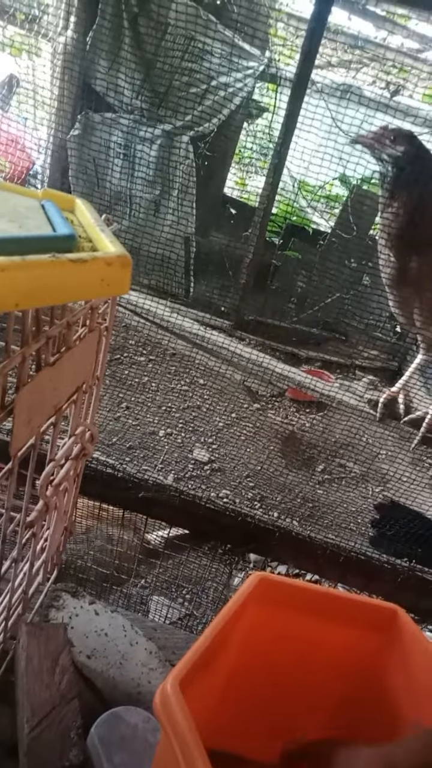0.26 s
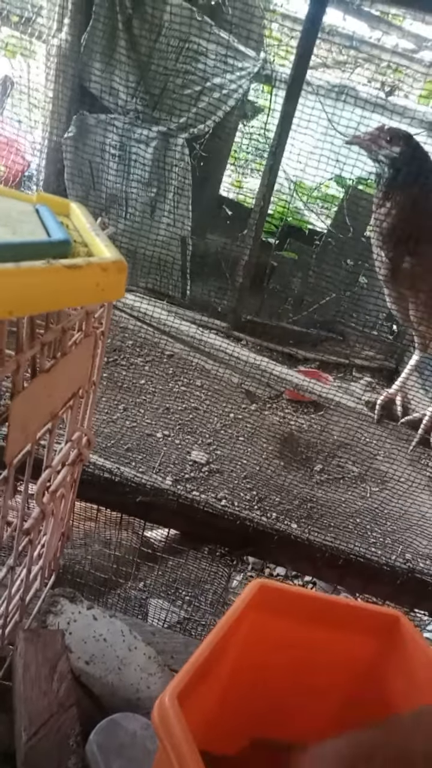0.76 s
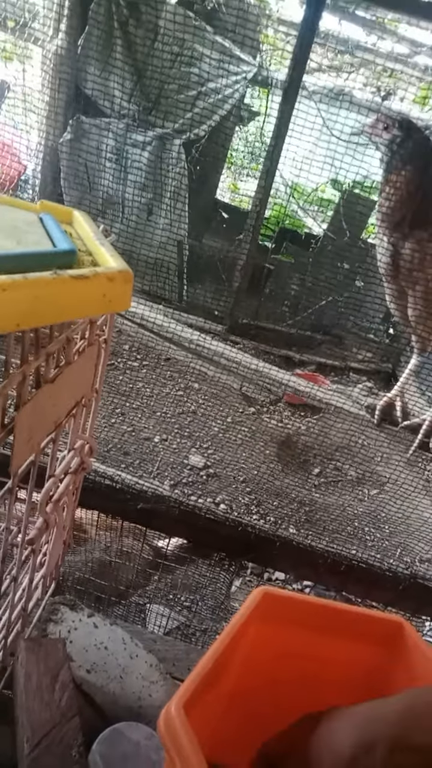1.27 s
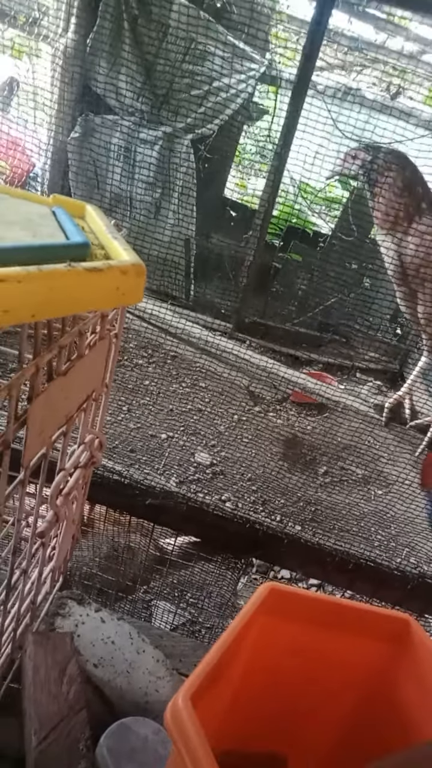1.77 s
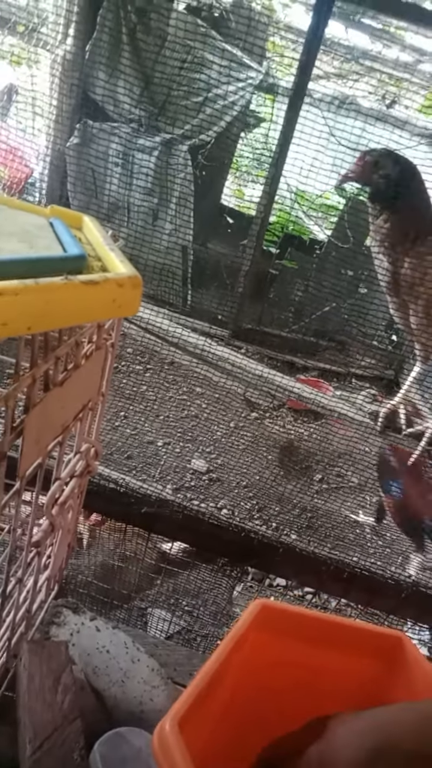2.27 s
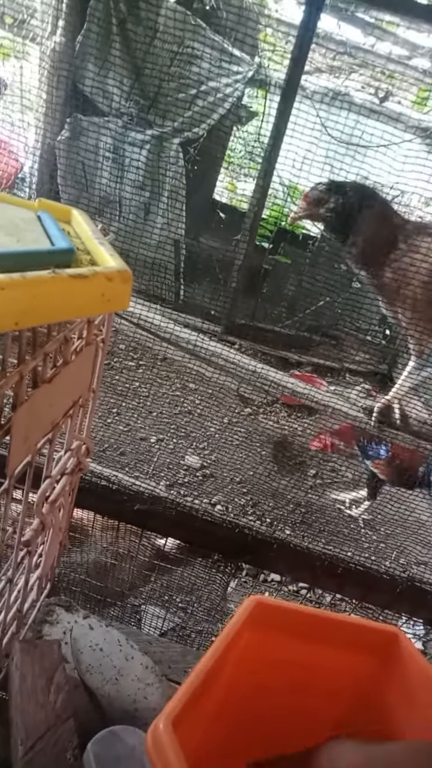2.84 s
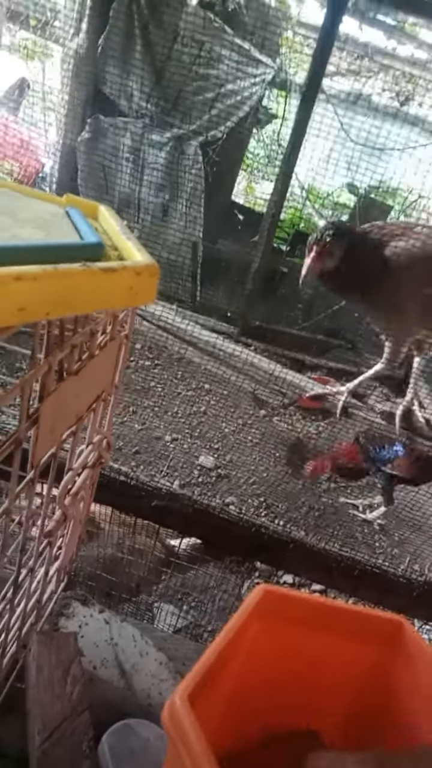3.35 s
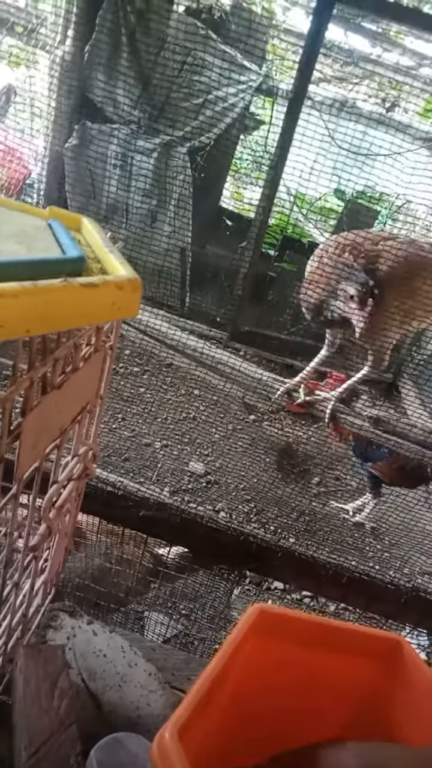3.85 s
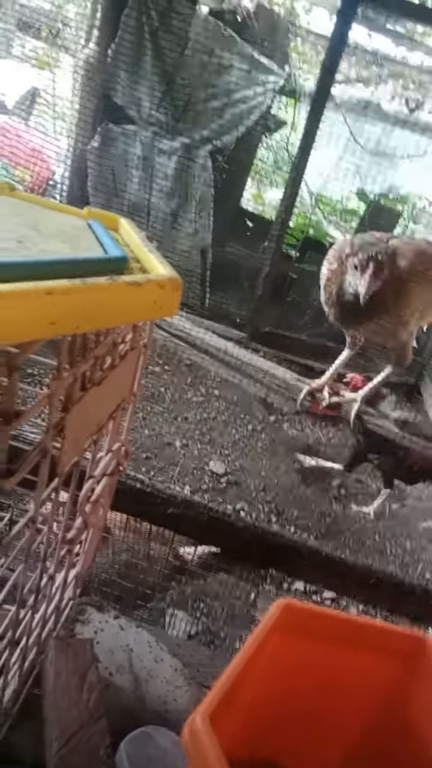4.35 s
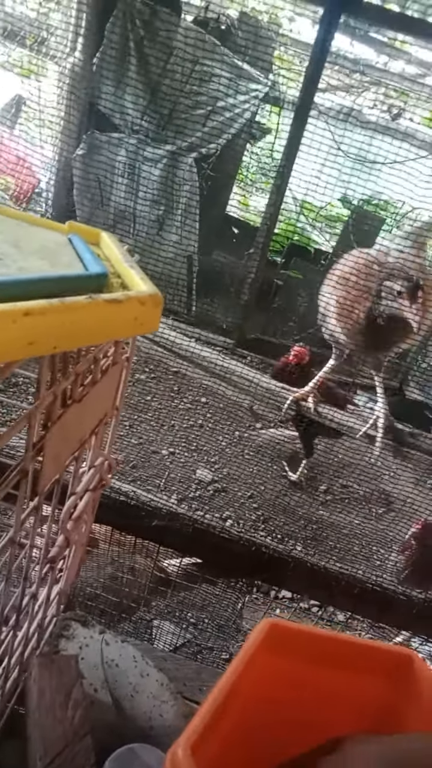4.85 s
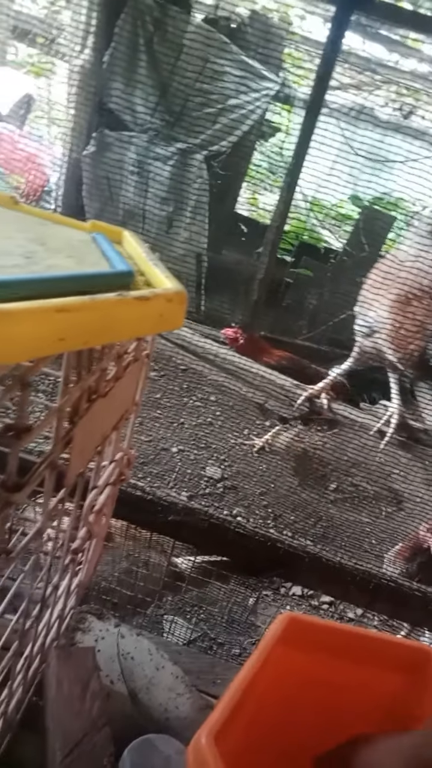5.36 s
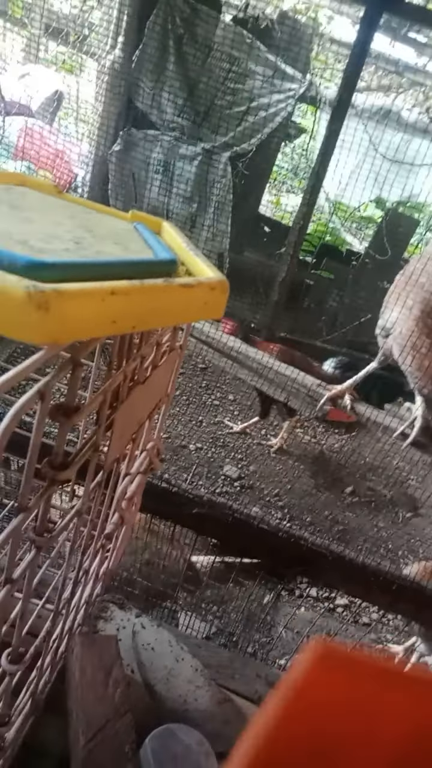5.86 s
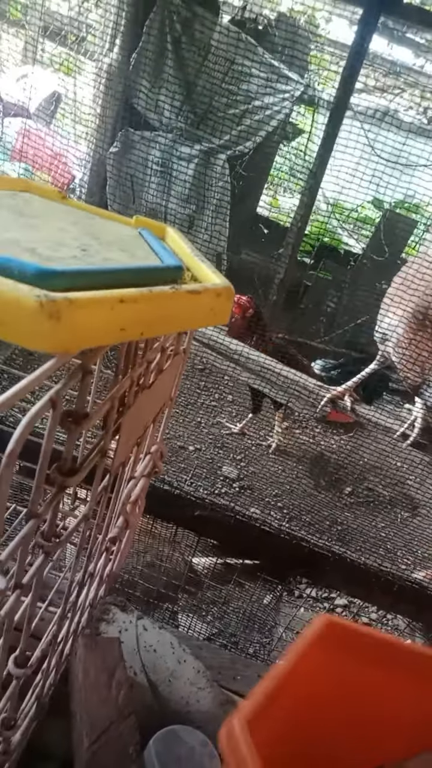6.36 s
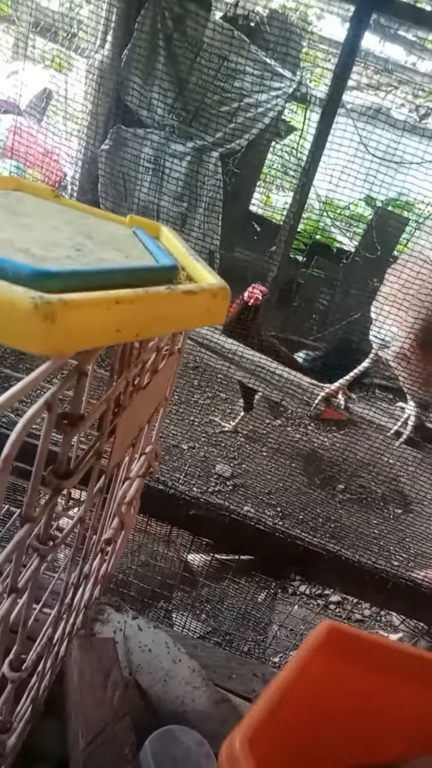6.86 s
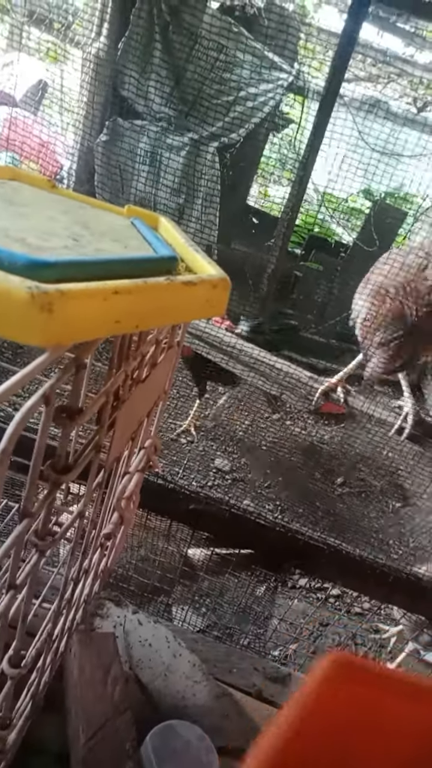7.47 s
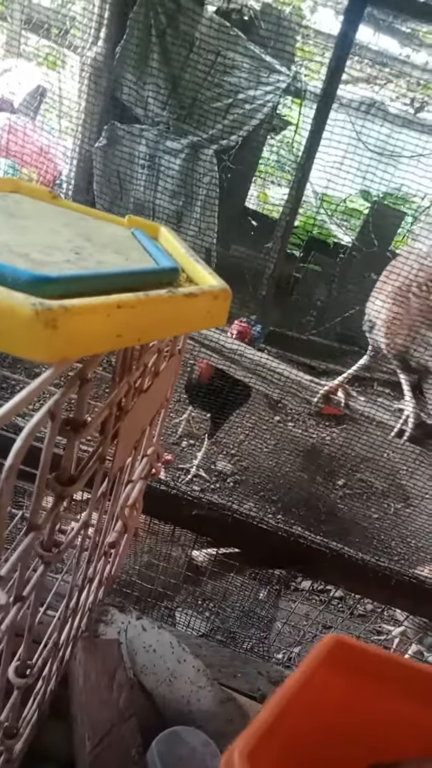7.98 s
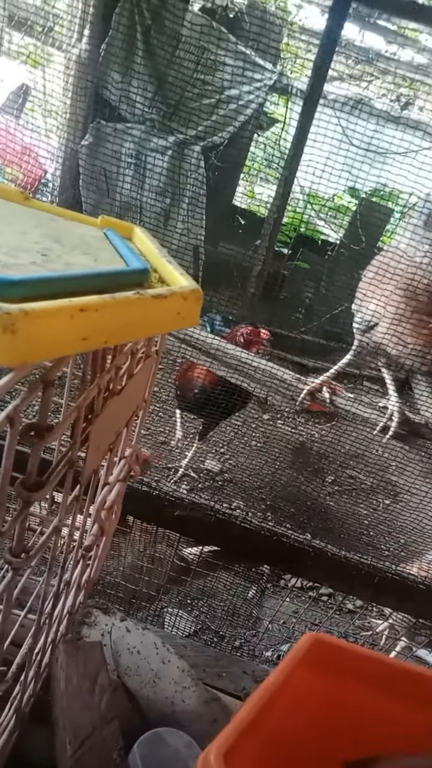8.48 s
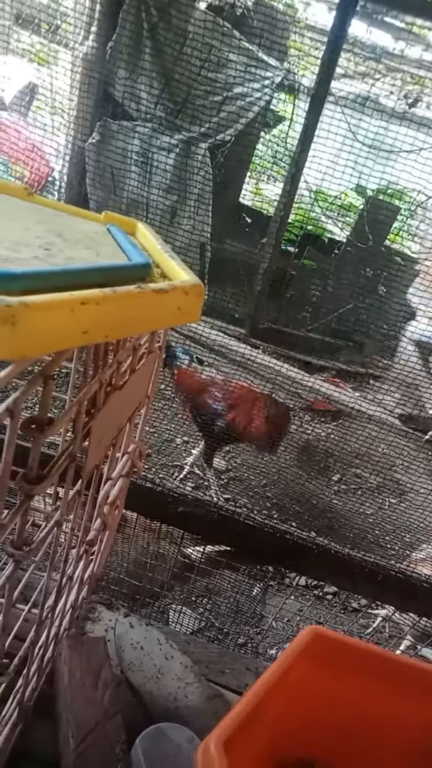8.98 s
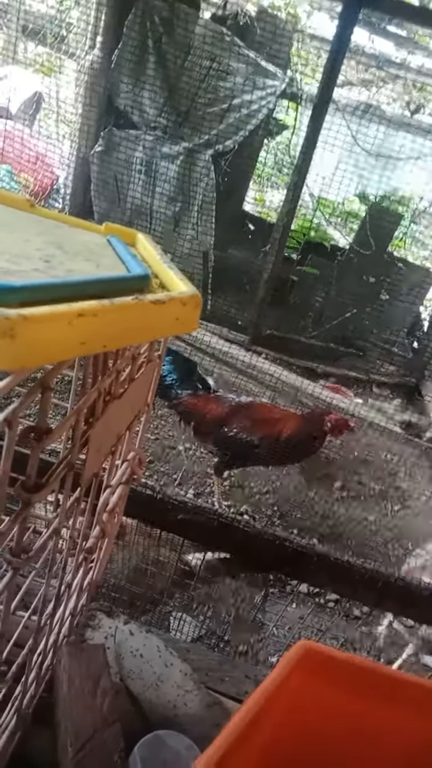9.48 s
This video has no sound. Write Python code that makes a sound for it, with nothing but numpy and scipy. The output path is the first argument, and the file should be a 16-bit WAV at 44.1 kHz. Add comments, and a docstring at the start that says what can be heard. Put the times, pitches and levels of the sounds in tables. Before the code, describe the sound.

A rooster crows loudly and harshly up close while hens cluck and wings thump; later a duller, distant rooster answers amid heavy flapping.

```python
"""A pen of netting and boards, with reflections from a decaying noise tail. At first a far engine hums as two
wavering sines; hens cluck through throat-filtered harmonics, and feathers and litter rustle as filtered noise.
A close rooster crows in rasping syllables, then holds a note whose cycle doubles twice, while feet knock on boards.
Wing beats, scrapes and wire crackle recur as ringing modes and noise; later a duller far rooster answers with
a throbbing note among the beats, and the last flaps and rustles follow over quiet yard air."""
import sys
import numpy as np
from scipy import signal
from scipy.fft import rfft, irfft, next_fast_len
from scipy.io import wavfile
from scipy.ndimage import uniform_filter1d

SR = 44100
rng = np.random.default_rng(int(sys.argv[2]) if len(sys.argv) > 2 else 0)


def store_pcm(level_fs):
    """Save levels as 16-bit WAV."""
    pcm = np.round(np.clip(level_fs, -1, 1) * 32767).astype(np.int16)
    wavfile.write(sys.argv[1], SR, np.atleast_2d(pcm).T)


N = 428652  # samples
T = np.arange(N) / SR  # s

# Close crow, rasping syllables: start_s, length_s, first_pitch_hz, middle_pitch_hz, last_pitch_hz,
# level_db, roughness (0 = clean)
SYLLABLES = [(1.018, 0.1413, 847.9, 838.4, 831.5, -21.5, 0.87), (1.269, 0.099, 821.7, 1019, 1124, -19, .88),
             (1.443, 0.0356, 832.3, 849.6, 847.6, -18.5, 0.42),
             (1.475, 0.4576, 932, 926.4, 860.8, -20, 0.83), (1.962, .055, 845.2, 827, 835.6, -26, 0.9),
             (2.895, 0.0272, 877.3, 883, 852.9, -30.5, 0.61)]
# Moments when the membranes lock and the voice turns cleaner and louder; the fundamental drops or rises:
# centre_s, half_length_s, gain_db, fundamental_gain_db
LOCKS = [(1.088, .015, 7.5, -12), (1.304, 0.011, 1.5, 1.5), (1.896, 0.011, 5.5, -12.5),
         (6.732, 0.026, 3.5, 4)]
LOCK_CLEANS, LOCK_OVERTONES_DB = .8, -9  # share of roughness removed; change of the third partial and up
# Resonances of the close rooster's throat: frequency_hz, gain_db
THROAT = [(430, -35), (600, -23.5), (700, -4), (950, -5), (1150, -10), (1450, -11.5), (1700, 0.5),
          (2230, -4), (2650, -18.5), (3070, -3), (3400, -20), (3700, -32), (5000, -46.5), (6400, -35),
          (7300, -42), (7700, -55), (15000, -62)]
# Level of the held note, with a quick rise, slight dip and late recovery: time_s, level_db
NOTE_LEVEL = [(2.015, -24), (2.045, -16), (2.1, -17), (2.22, -17), (2.3, -17), (2.54, -17.5), (2.74, -18.5),
              (2.83, -16.5)]
# Whole-multiple partials of the held note: pitch_multiple, gain_db
HELD_LINES = [(1, -19), (2, 0), (3, -24), (4, -24), (5, -50), (6, -57), (7, -44), (8, -48), (9, -50),
              (10, -55)]
# Subharmonic lines of the first cycle doubling: pitch_multiple, gain_db
HALF_LINES = [(1.5, -12.5), (2.5, -3.5), (3.5, 1), (5.5, -35), (7.5, -27), (8.5, -39)]
# Subharmonic lines of the second cycle doubling: pitch_multiple, gain_db
QUARTER_LINES = [(.75, -4.5), (1.25, -5.5), (1.75, 2), (2.25, 3.5), (2.75, -21), (3.25, -8.5), (7.25, -25),
                 (7.75, -29)]
# What the narrowed beak does to the partials: pitch_multiple, gain_db
BEAK_COLOUR = [(1, 9.5), (2, -0.5), (4, -13), (7, 1), (7.5, 14), (8, 17), (9, 0.5)]

ATTACK_S, RELEASE_DB_PER_S = .022, 478  # of a crow's syllables and notes
# The close held note sinks as the air runs out
NOTE_S, NOTE_LENGTH_S, NOTE_HZ, SAG_HZ_PER_S = 1.985, 0.9024, 831, 13
HALVES_S, HALVES_DB, HALVES_FADE_DB_PER_S = 2.305, -31, -11.5  # first doubling: start, starting gain, fade
QUARTERS_S, QUARTERS_LENGTH_S, QUARTERS_DB = 2.345, 0.1373, -44.5  # brief second doubling
SPLIT_TREBLE_DB = -8.5  # the second doubling dulls the top partials
# The beak narrows late: softer overall, middle partials thinner, fundamental and treble stronger
BEAK_S, BEAK_CLOSING_S, BEAK_LOSS_DB = 2.5766, .035, -5
SMEAR_RAD = .14  # scale of the phase unsteadiness that each multiple above the fourth adds
FLUTTER_HZ = 36.934  # mean rate at which rough membranes take turns
PULSING_DB = 2  # swing of the voice level per unit of roughness

# Far crow syllables: start_s, length_s, first_pitch_hz, middle_pitch_hz, last_pitch_hz,
# level_db, roughness (0 = clean)
FAR_SYLLABLES = [(5.775, 0.125, 763.6, 778.6, 776, -43.5, 0.68),
                 (6.04, 0.1504, 881.4, 999.2, 968.7, -38.5, 0.61),
                 (6.29, 0.41, 820.4, 935.6, 799.5, -35, 0.783)]
# Resonances of the far rooster's throat: frequency_hz, gain_db
FAR_THROAT = [(500, -18.5), (800, -3), (900, -0.5), (1250, -7.5), (1600, -2.5), (1950, 1.5), (2400, -24),
              (2950, -17), (3400, -30), (4000, -38), (4850, -26.5), (5700, -45.5), (7000, -49),
              (9000, -53.5)]
# Partials of the far held note: pitch_multiple, gain_db
FAR_LINES = [(1, -13), (1.5, -30), (2, -0.5), (3, -31.5), (5, -34), (6, -34)]
# The far note scoops up to pitch, sinks and fades
FAR_NOTE_S, FAR_NOTE_LENGTH_S, FAR_NOTE_DB, FAR_FADE_DB_PER_S = 6.8, 0.7472, -39.5, -6
FAR_HZ, FAR_SAG_HZ_PER_S, SCOOP_HZ, SCOOP_S = 835, 76, 87.5, 0.069
THROB_HZ, THROB_DEPTH = 10.1, 0.521  # round swells between sharp dips

# Hen calls: start_s, length_s, first_pitch_hz, last_pitch_hz, level_db, roughness (0 = clean)
CLUCKS = [(.235, 0.063, 372, 350.7, -51, 1.23), (2.754, 0.0513, 607.4, 565.7, -38, 0.66),
          (2.871, 0.0554, 616.6, 547, -37.5, 0.67), (3.36, 0.0714, 399, 343.6, -44, 1.04),
          (4.184, 0.0399, 416.3, 570.4, -45.5, .4), (4.221, 0.065, 577.3, 776.2, -40.5, 0.71),
          (4.345, 0.1126, 512.7, 545.6, -41, .9), (4.922, 0.29, 860, 1026, -68.5, 0.41),
          (6.18, 0.0612, 599.7, 361.6, -38, .4), (7.539, 0.10177, 756, 619.7, -39.5, 0.38),
          (7.988, 0.0566, 617.6, 611.7, -35.5, 0.65), (8.11, 0.0434, 622, 590.4, -41, 0.68),
          (8.264, .105, 414.8, 304.2, -46, 0.31), (8.67, 0.0381, 642, 591.5, -47.5, 0.66)]
# Resonances of a hen's throat: frequency_hz, gain_db
HEN_THROAT = [(200, -1.5), (340, 0.5), (480, -7.5), (630, -4.5), (850, -4.5), (1220, -3), (1500, -16),
              (1850, -14.5), (2150, -25), (4000, -36), (8000, -52.5)]

# Wing beats: start_s, relative_level_db, second_wing_lag_s (0 = both together)
BEATS = [(.362, -36.5, 0.0014), (.565, -22, 0.0218), (.684, -21.5, 0.0273), (1.571, -26, 0),
         (1.795, -23.5, 0.0498), (1.869, -14, .01), (3.027, -31.5, 0.054), (3.121, -34.5, 0.001),
         (3.203, -30.5, 0.0538), (3.536, -29.5, 0.0636), (3.698, -33, 0.0418), (4.158, -28, 0.0412),
         (4.267, -30, 0.0052), (4.453, -22, 0.0219), (4.507, -26.5, 0), (4.548, -26, 0.0016),
         (4.618, -32, 0.0013), (4.846, -31, 0.0494), (5.11, -37, 0.0338), (5.302, -47, 0.0033),
         (5.645, -34.5, 0.00025), (5.754, -29.5, 0.00098), (5.851, -29, 0.0037), (5.958, -19, 0),
         (6.252, -11, 0), (6.446, -14.5, 0.00024), (6.613, -13.5, 0), (6.797, -20, 0.0013),
         (6.953, -17.5, 0), (7.082, -24.5, 0), (7.188, -27, 0.0448), (7.312, -30, 0.00104),
         (7.527, -21.5, 0.0272), (8.021, -32, 0), (8.957, -40.5, 0.0011), (9.059, -33.5, 0.038),
         (9.254, -22, 0.0265)]
# Mean modes of the boom of pushed air: frequency_hz, gain_db, t60_s
THUMP_MODES = [(113, -14.5, 0.081), (175.9, -4, 0.0956), (242.5, -4, 0.062), (339.93, -9, 0.018),
               (421.4, 1, 0.03617), (637.7, -16, .039)]
SECOND_WING_DB, FLICK_DB = -2.5, -21  # the later wing against the first; the feather flick against its beat
# Hard slaps of feathers: time_s, relative_level_db
SLAPS = [(0.585, -27), (0.6834, -18), (0.7024, -17.5), (3.2061, -41), (4.2662, -36.5), (4.3924, -30),
         (4.422, -35.5), (4.447, -27.5), (4.455, -23.5), (4.4697, -24.5), (4.494, -31), (5.7564, -30.5),
         (5.9573, -31.5), (6.469, -38.5), (7.5289, -20.5), (9.0615, -43), (9.2515, -32), (9.28, -21.5)]
# Bouts of feathers brushing: peak_s, relative_level_db, rise_s, fall_s (each over 20 dB)
RUSTLES = [(.48, -47, 0.085, 0.01), (.59, -44.5, 0.16, 0.5836), (1.88, -39.5, .3, 0.4967),
           (3.08, -53, 0.0564, 0.23), (3.212, -49, 0.039, 0.0421), (3.32, -49.5, 0.0675, 0.1346),
           (3.4, -48, 0.063, 0.04), (4.28, -46.5, 0.062, 0.1209), (4.36, -50, 0.059, 0.1072),
           (4.475, -43, 0.117, 0.0144), (5.81, -42.5, 0.055, 0.507), (5.98, -39.5, 0.046, 0.1383),
           (6.28, -57, 0.2293, 0.583), (7.38, -53, 0.0793, 0.8046), (7.58, -45, 0.167, 0.2093),
           (9.1, -51.5, .04, 0.104), (9.265, -39, 0.0762, 0.12)]
# Spectrum of feathers and litter: frequency_hz, gain_db
FEATHERS = [(150, 0), (400, 2.5), (750, 0), (1150, 4.5), (1700, -1), (2600, 0), (3900, -3.5), (5000, -20.5),
            (6500, -20), (8000, -35.5), (15000, -43.5)]
SNAPS_PER_S, SNAPS_DB = 160, -3  # mean rate of lone snaps; their rms against the bout

# Claws on grit and wire: start_s, relative_level_db
CLAWS = [(0.823, -23.5), (0.855, -39), (0.8761, -24.5), (3.4203, -29.5), (3.436, -34.5), (3.6065, -29.5),
         (3.6268, -27), (4.52, -28), (8.6313, -35), (9.5376, -35)]
# Resonance of a claw: claw_pitch_multiple, gain_db
CLAW_RING = [(.7, -22), (.93, 0), (1.35, -5), (1.68, -7), (2, -20), (5, -39)]
CLAW_HZ = 2980  # mean claw pitch
# Feet landing on boards: start_s, relative_level_db
KNOCKS = [(1.679, -28), (1.797, -15.5), (1.837, -15.5), (1.917, -9.5), (3.027, -30), (3.076, -27),
          (3.26, -29), (4.27, -27), (4.355, -28), (4.454, -20.5), (7.531, -27.5), (9.062, -32.5)]
# Mean modes of a board: frequency_hz, gain_db, t60_s
BOARD_MODES = [(267.6, -6, 0.056), (505, -1.5, 0.021), (710, -6.5, .04), (1080, -6.5, .04),
               (1460, -13, 0.023)]
# Wire netting crackling as birds brush it: start_s, length_s, level_db
CRACKLES = [(3.634, 0.0876, -62.5), (4.632, 0.0441, -49), (5.821, 0.0224, -49), (6.271, 0.074, -53),
            (7.347, 0.073, -65.5), (7.855, .05, -52), (7.939, 0.0462, -57), (9.495, 0.101, -57)]
# Spectrum of the wire ticks: frequency_hz, gain_db
NETTING = [(1500, -7.5), (3300, 3), (4300, -8), (5200, 0.5), (6500, -3.5), (7600, -18.5), (8800, -10.5),
           (15000, -21)]

# Far engine: time_s, mean_firing_rate_hz, mean_level_db
ENGINE = [(0, 72.62, -57.5), (.95, 75.85, -49), (1.08, 107.6, -50), (1.25, 113, -46), (1.9, 114.2, -42),
          (2.7, 119, -51), (3.2, 118.4, -70)]
# Spectrum of the yard air: frequency_hz, gain_db
YARD = [(35, -32), (62, -15.5), (120, -2), (250, -12.5), (500, -20), (3500, -27.5), (5000, -40),
        (6400, -36.5), (8000, -44), (15000, -45.5)]
YARD_DB = -62  # mean level
TOP_HZ = 15700  # upper edge of the passband


def close_rooster():
    """Period doubling: chaotic syllables lock into a clean note, whose cycle doubles twice before it breaks off."""
    rasp = syllables(SYLLABLES, THROAT, wobble=.038, wobble_rate=320, shimmer_db=5.5, air=3.8,
                     overtones_db=-4.5, fundamental_db=1)
    t = T - NOTE_S
    unsteady = 1 + 0.0024 * walk(160) + 0.002064 * walk(16)
    phase = 2 * np.pi * np.cumsum((NOTE_HZ - SAG_HZ_PER_S * t) * unsteady) / SR
    hiss = undb(-36.5) * unit(colour(rng.standard_normal(N), THROAT))
    whole = (partials(phase, HELD_LINES) + hiss) * undb(curve(NOTE_LEVEL))

    since_split = T - HALVES_S
    halves_db = HALVES_DB + HALVES_FADE_DB_PER_S * np.maximum(since_split, 0) + 1.3 * walk(20)
    halves = partials(phase, HALF_LINES) * gate(since_split, NOTE_LENGTH_S) * undb(halves_db)
    quarters_gate = gate(T - QUARTERS_S, QUARTERS_LENGTH_S)
    quarters = partials(phase, QUARTER_LINES) * quarters_gate * undb(QUARTERS_DB)
    held = (whole + halves + quarters) * gate(t, NOTE_LENGTH_S) * undb(BEAK_LOSS_DB * narrowing())
    return rasp, held


def partials(phase, lines, flutter_db=0.74, wander_db=1.095):
    """Additive synthesis: sines on multiples of one phase; the high ones flutter and wander most."""
    out = 0
    beak = narrowing()
    split = gate(T - QUARTERS_S, QUARTERS_LENGTH_S)
    for k, db in lines:
        beak_db = beak * np.interp(k, *np.transpose(BEAK_COLOUR))
        split_db = SPLIT_TREBLE_DB * split * np.clip((k - 3) / 2, 0, 1)
        waver_db = flutter_db * k * np.tanh(walk(26)) + wander_db * max(k - 2, 0) * np.tanh(walk(12))
        smear = SMEAR_RAD * max(k - 4, 0) * walk(110)
        out = out + np.sqrt(2) * np.sin(k * phase + smear) * undb(db + beak_db + split_db + waver_db)
    return out


def narrowing():
    """Changing aperture: how far the beak has narrowed, 0-1."""
    return .5 + .5 * np.tanh((T - BEAK_S) / (2 * BEAK_CLOSING_S))


def syllables(rows, throat, overtones_db, fundamental_db, **membranes):
    """Synchronisation: each syllable arches in pitch and rasps, except where the two membranes lock."""
    out = np.zeros(N)
    at, half, gain_db, low_db = np.transpose(LOCKS)
    for s, length, first_hz, middle_hz, last_hz, db, rough in rows:
        t = T[:int(length * SR) + SR // 6]
        along = np.minimum(t / length, 1)
        arch = np.polyfit([0, .5, 1], [first_hz, middle_hz, last_hz], 2)
        hz = np.polyval(arch, along)
        locks = np.exp(-((s + t[:, None] - at) / half) ** 4)  # one flat-topped bump per lock
        lock = locks.sum(axis=1)
        voice = syrinx(hz, rough * (1 - LOCK_CLEANS * lock), throat,
                       overtones_db=overtones_db + LOCK_OVERTONES_DB * lock,
                       fundamental_db=fundamental_db + locks @ low_db, **membranes)
        add(out, s, voice * gate(t, length) * undb(db + locks @ gain_db))
    return out


def syrinx(hz, rough, throat, wobble, wobble_rate, shimmer_db, air, overtones_db, fundamental_db,
           lower=.83, lower_octave_db=-12):
    """Source and filter: two coupled membranes, the slacker at `lower` times the pitch, drive a resonant throat."""
    n = len(hz)
    # the membranes take turns at a nearly steady rate, and the pitch swings at each handover
    cycle = 2 * np.pi * np.cumsum(FLUTTER_HZ * (1 + .14 * walk(70, n))) / SR
    stumble = wobble * rough * (walk(wobble_rate, n) + 1.3 * np.sin(2 * cycle))
    phase = 2 * np.pi * np.cumsum(hz * (1 + stumble)) / SR
    turn = np.minimum(rough, 1) * (.5 + .5 * np.sin(cycle))
    low = ((1 - turn) * np.sin(phase) + turn * np.sin(lower * phase)) * undb(fundamental_db)
    octave = turn * np.sin(2 * lower * phase) * undb(lower_octave_db)
    upper = 0
    for k in range(2, 10):
        shimmer = shimmer_db * rough * walk(wobble_rate, n)
        swell_db = 2.0 * walk(14, n)  # each harmonic swells and fades slowly by itself
        upper = upper + np.sin(k * phase) * undb(overtones_db * (k > 2) + shimmer + swell_db)
    # air hisses through in puffs as the membranes take turns
    puffs = air * rough * (.5 + turn) * rough * rng.standard_normal(n)
    voice = colour(low + octave + upper + puffs, throat)
    return even(voice) * undb(PULSING_DB * rough * np.cos(2 * cycle))


def gate(t, length):
    """Breath envelope: smooth attack, hold, then exponential decay."""
    attack = np.sin(np.pi / 2 * np.clip(t / ATTACK_S, 0, 1)) ** 2
    return attack * undb(-RELEASE_DB_PER_S * np.maximum(t - length, 0))


def far_rooster():
    """Amplitude modulation: arching rough syllables, then a sinking, fading note that throbs ten times a second."""
    out = syllables(FAR_SYLLABLES, FAR_THROAT, wobble=0.0246, wobble_rate=270, shimmer_db=6.5, air=2.5,
                    overtones_db=-2.5, fundamental_db=2.5, lower=.925, lower_octave_db=5)
    t = T[:SR]
    hz = FAR_HZ - FAR_SAG_HZ_PER_S * t - SCOOP_HZ * np.exp(-t / SCOOP_S)
    phase = 2 * np.pi * np.cumsum(hz * (1 + 0.0042 * walk(200, len(t)))) / SR
    note = sum(np.sqrt(2) * np.sin(k * phase) * undb(db + 4.5 * walk(35, len(t))) for k, db in FAR_LINES)
    throb = np.abs(1 - THROB_DEPTH * np.exp(2j * np.pi * THROB_HZ * t))
    level = undb(FAR_NOTE_DB + FAR_FADE_DB_PER_S * t)
    add(out, FAR_NOTE_S, note * gate(t, FAR_NOTE_LENGTH_S) * throb * level)
    return out


def hens():
    """Source and filter: gliding harmonics through a hen's throat make short clucks and soft whines."""
    out = np.zeros(N)
    for s, length, first_hz, last_hz, db, rough in CLUCKS:
        n = int(length * SR)
        glide = np.linspace(first_hz, last_hz, n)
        voice = syrinx(glide, np.full(n, rough), HEN_THROAT, wobble=0.0524, wobble_rate=400,
                       shimmer_db=5.5, air=2.6, overtones_db=-0.5, fundamental_db=0)
        add(out, s, undb(db) * voice * signal.windows.tukey(n, .6))
    return out


def thumps():
    """Damped modes: each wing stroke pushes a puff of air that booms briefly and scatters in the pen."""
    out, t = np.zeros(N), T[:SR // 4]
    for s, db in strokes():
        # the bird moves, so each puff rings differently
        ring = modes(THUMP_MODES, t, gain_spread_db=2.2, pitch_spread=.045, delay=.005)
        ring = ring * np.sin(np.pi / 2 * np.minimum(t / 0.00713, 1)) ** 2
        puff = undb(db + 2.5) * ring / np.abs(ring).max()
        add(out, s, puff + undb(-8.5) * pen(puff, t60=0.2023))
    return signal.sosfilt(signal.butter(3, 130, "high", fs=SR, output="sos"), out)


def strokes():
    """Paired sources: time and level of every wing stroke; a lagging second wing is a little weaker."""
    first = [(s, db) for s, db, lag in BEATS]
    second = [(s + lag, db + SECOND_WING_DB) for s, db, lag in BEATS if lag > 0]
    return first + second


def modes(rows, t, gain_spread_db, pitch_spread, delay=0):
    """Modal synthesis: decaying sines, randomly spread in gain and pitch."""
    ring = 0
    for (hz, gain, t60), c in zip(rows, rng.standard_normal((len(rows), 2))):
        decay = undb(gain + gain_spread_db * c[0] - 60 * t / t60)
        ring = ring + decay * np.sin(2 * np.pi * hz * (1 + pitch_spread * c[1]) * (t - delay))
    return ring


def feathers():
    """Friction noise: barbs and dry litter crackle in band noise, with a burst at each slap or wing stroke."""
    bouts = 0
    for s, db, rise, fall in RUSTLES:
        drop = np.where(T < s, ((s - T) / rise) ** 2, (T - s) / fall)
        bouts = bouts + undb(db - 20 * drop)
    force, t = bouts * undb(3.2 * walk(90)), T[:SR // 6]
    flicks = [(s, db + FLICK_DB) for s, db in strokes()]
    for s, db in SLAPS + flicks:
        add(force, s - .001, undb(db - 2 - 60 * t / 0.061) * np.minimum(t / 0.0023, 1))
    # the colour shifts as the wing folds: each band swells and crackles by itself
    barbs = 0
    edges = np.geomspace(120, 16000, 13)
    for band in zip(edges, edges[1:]):
        crackle = rng.standard_normal(N) * undb(4.6 * walk(380))
        band_filter = signal.butter(2, band, "band", fs=SR, output="sos")
        barbs = barbs + signal.sosfilt(band_filter, crackle) * undb(7.3 * walk(70))
    brushing = even(colour(barbs, FEATHERS)) * undb(2 + 3 * walk(500)) * force
    # stiff quills and bits of litter snap singly among the barbs
    snaps = (rng.random(N) < SNAPS_PER_S / SR) * rng.standard_normal(N)
    return brushing + unit(colour(snaps, FEATHERS)) * bouts * undb(SNAPS_DB)


def claws():
    """Resonant friction: a gritty, stuttering noise scrape excites a short ring."""
    out, t = np.zeros(N), T[:SR // 6]
    for s, db in CLAWS:
        hz = CLAW_HZ * (1 + .05 * rng.standard_normal())
        grit = rng.standard_normal(len(t)) * undb(3.5 * walk(500, len(t)))
        ring = colour(grit, [(multiple * hz, gain) for multiple, gain in CLAW_RING])
        add(out, s, unit(ring) * undb(db - 8.5 - 60 * t / 0.055) * np.minimum(t / 0.001, 1))
    return out


def knocks():
    """Struck plate: a foot lands on a board, whose modes ring differently at each spot."""
    out, t = np.zeros(N), T[:SR // 6]
    for s, db in KNOCKS:
        ring = modes(BOARD_MODES, t, gain_spread_db=2.5, pitch_spread=.07)
        add(out, s, undb(db) * ring * np.minimum(t / 0.0014, 1))
    return out


def netting():
    """Stick and slip: unevenly modulated bright noise for wires slipping over each other."""
    out = np.zeros(N)
    for s, length, db in CRACKLES:
        t = T[:int(length * SR) + SR // 20]
        ticks = rng.standard_normal(len(t)) * undb(5.9 * walk(450, len(t)))
        ticks = unit(colour(ticks, NETTING))
        add(out, s, ticks * undb(db - 1500 * np.maximum(t - length, 0)))
    return out


def engine():
    """Periodic firing: a wavering low hum of a fundamental and its octave from beyond the yard."""
    phase = 2 * np.pi * np.cumsum(curve(ENGINE) * (1 + 0.18 * walk(49))) / SR
    hum = np.sin(phase) + undb(-14.5) * np.sin(2 * phase)
    return hum * loudness(ENGINE, axis=2) * undb(4 * walk(30))


def yard():
    """Broadband ambience: quiet outdoor air as coloured noise, swelling a little."""
    return unit(colour(rng.standard_normal(N), YARD)) * undb(YARD_DB + 0.52 * walk(3.2))


def pen(x, t60=0.28):
    """Reverberation by convolution: boards and roof scatter sound into a short, slightly dull tail."""
    t = T[:SR // 2]
    tail = colour(rng.standard_normal(len(t)), [(100, 0.0), (3000, 1.5), (7000, -0.5), (15000, -7.5)])
    tail *= undb(-60 * t / t60) * (t > .005)
    return signal.fftconvolve(x, tail / np.sqrt(np.sum(tail ** 2)))[:len(x)]


def undb(db):
    """Logarithmic level: decibels to amplitude gain."""
    return 10 ** (np.asarray(db) / 20)


def unit(x):
    """Normalisation: scale to rms 1."""
    return x / np.sqrt(np.mean(x ** 2))


def even(x):
    """Level equalisation: hold the running rms near 1."""
    return x / np.sqrt(uniform_filter1d(x ** 2, size=500) + 1e-9)


def curve(rows, axis=1):
    """Linear interpolation: one table column joined by straight lines in time."""
    rows = np.array(rows)
    return np.interp(T, rows[:, 0], rows[:, axis])


def loudness(rows, axis=1):
    """Level envelope: gain from a dB column, silent outside its smoothed span."""
    inside = (T >= rows[0][0]) & (T <= rows[-1][0])
    return undb(curve(rows, axis=axis)) * uniform_filter1d(1. * inside, size=400)


def response(hz, spectrum):
    """Frequency response: gain of a (Hz, dB) spectrum, interpolated on a logarithmic axis."""
    f, db = np.transpose(spectrum)
    return undb(np.interp(np.log(hz + 1), np.log(f), db))


def colour(x, spectrum):
    """Linear filtering: multiply by a spectrum that falls away below its first point."""
    n = next_fast_len(len(x))
    hz = np.arange(n // 2 + 1) * SR / n
    bass_fall = np.minimum(hz / spectrum[0][0], 1) ** 2
    return irfft(rfft(x, n) * response(hz, spectrum) * bass_fall, n)[:len(x)]


def walk(rate, n=N):
    """Random modulation: independent normal levels, `rate` a second, joined by lines."""
    return np.interp(np.arange(n) * rate / SR, np.arange(n // 8), rng.standard_normal(n // 8))


def add(out, s, x):
    """Superposition: mix a sound in at a time in seconds."""
    i = max(int(s * SR), 0)
    out[i:i + len(x)] += x[:N - i]


def scene():
    """Direct and reverberant sound: all sources summed, the birds with their own shares of reflections."""
    rasp, held = close_rooster()
    far, clucks = far_rooster(), hens()
    scratch = feathers() + claws() + netting() + knocks()
    wet = undb(-9.0) * rasp + undb(-16) * held + undb(-10) * far
    wet = wet + undb(-18) * clucks + undb(-14.5) * scratch
    birds = rasp + held + far + clucks + thumps() + scratch
    return (birds + pen(wet) + engine() + yard())[None]


def record(dry):
    """Band limiting: a steep elliptic low-pass removes the top treble."""
    return signal.sosfilt(signal.ellip(8, .2, 70, TOP_HZ, fs=SR, output="sos"), dry)


dry = scene()
out = record(dry)
store_pcm(out)
```